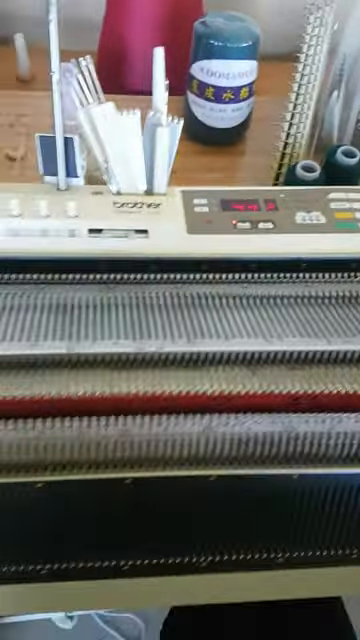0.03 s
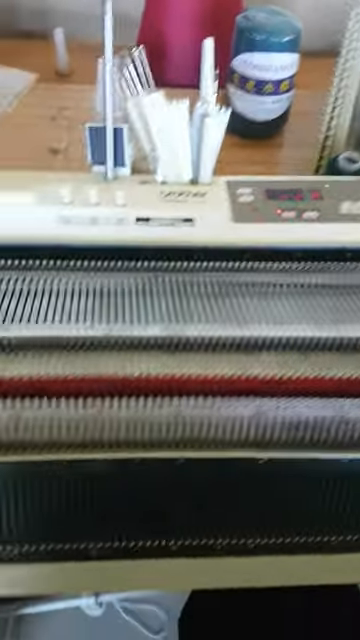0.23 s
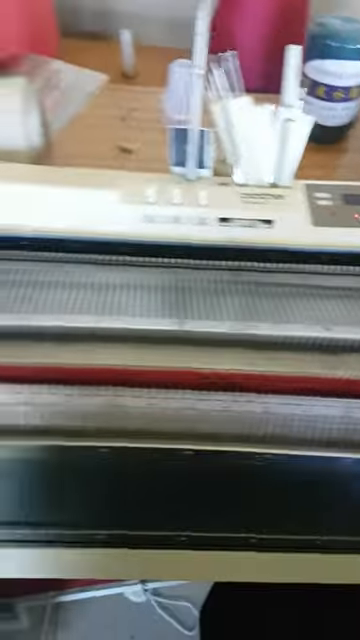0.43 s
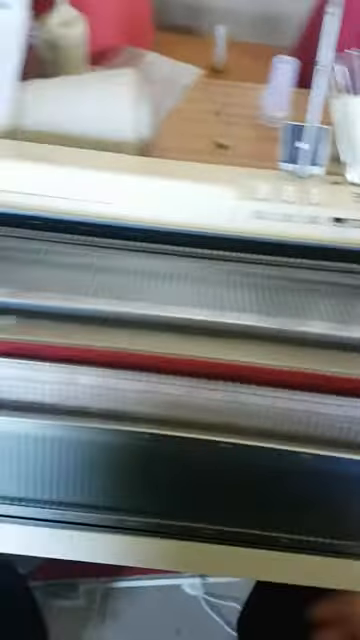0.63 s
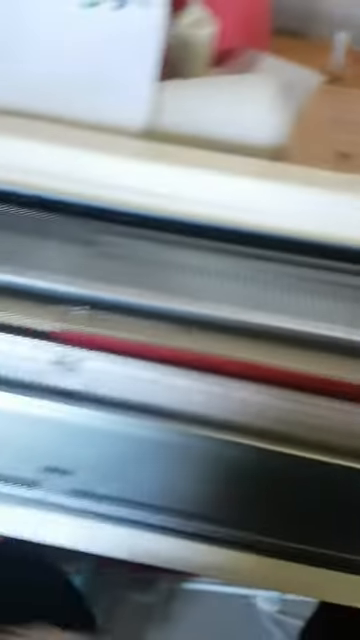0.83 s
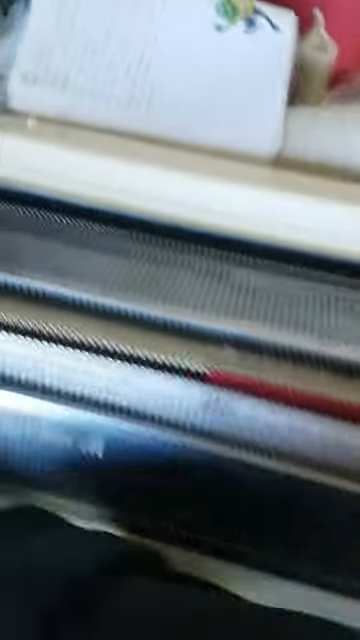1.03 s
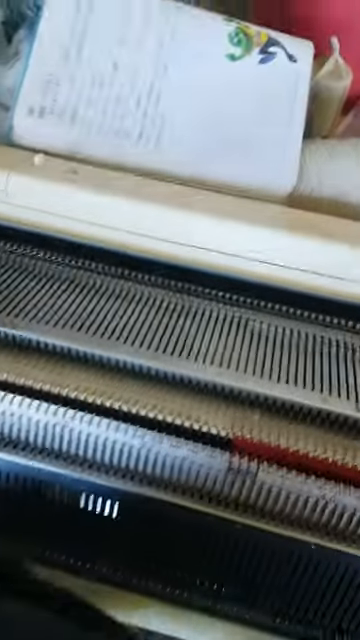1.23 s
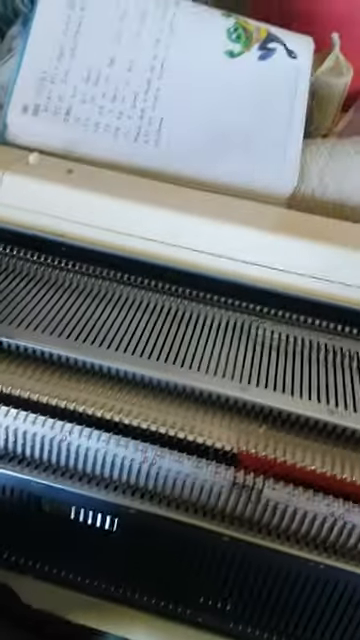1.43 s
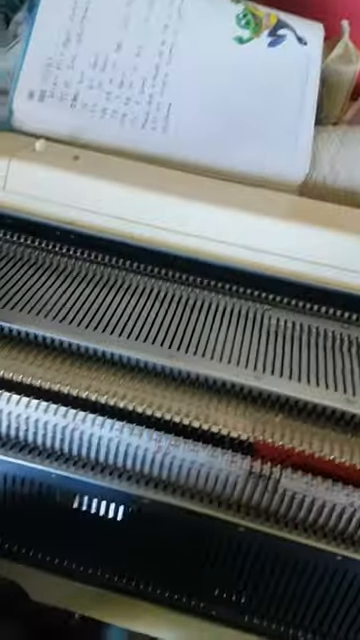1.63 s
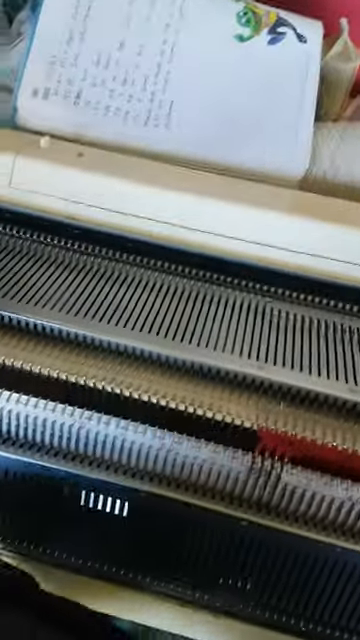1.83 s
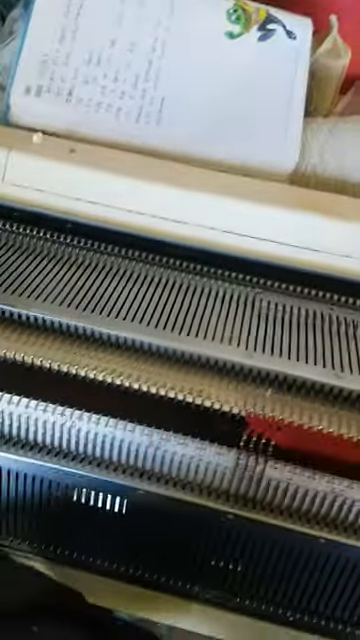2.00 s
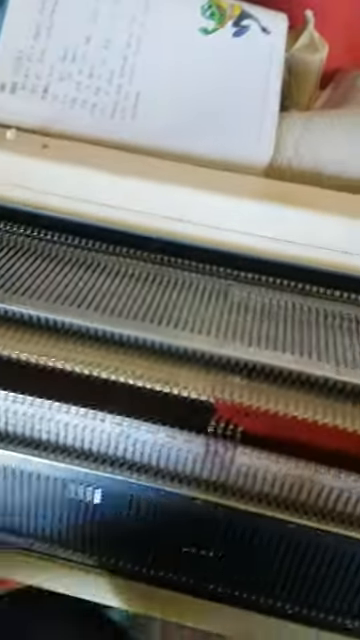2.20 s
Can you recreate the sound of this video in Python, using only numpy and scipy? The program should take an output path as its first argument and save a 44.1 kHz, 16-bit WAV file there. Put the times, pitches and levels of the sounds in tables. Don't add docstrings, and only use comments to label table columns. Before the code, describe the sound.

A knitting machine's metal needle bed is lowered in a small quiet room: faint dull hand taps and tiny ticks, two sharp latch snaps, then a heavy clattering clunk with rattling needles, close stereo handheld microphone.

```python
import sys
import numpy as np
from scipy import signal
from scipy.fft import rfft, irfft, next_fast_len
from scipy.io import wavfile
from scipy.ndimage import map_coordinates

SR = 44100
rng = np.random.default_rng(int(sys.argv[2]) if len(sys.argv) > 2 else 0)


def field_ratio(decibels):
    return 10 ** (np.asarray(decibels, dtype=float) / 20)


def to_wav(s):
    ch = np.atleast_2d(s).T
    pcm = np.round(np.clip(ch, -1, 1) * 32767)
    wavfile.write(sys.argv[1], SR, pcm.astype(np.int16))


N = 99665

# (f/Hz, level/dB, t60/s)
BED_MODES = [(96.6, -4, 0.19), (213, 4, 0.11), (273.5, 7, 0.058), (328, -4.5, 0.11), (396, 4, 0.089),
             (480, -2, 0.093), (612, -1, 0.17), (674, 5, 0.045), (845, -1, 0.1), (938, 0, 0.075),
             (988, -2, 0.12), (1150, -21, 0.028), (1510, -1, 0.042), (2304, -3.5, 0.05)]
# (t/s, crack level/dB, bed level/dB, ring length factor)
BED_HITS = [(1.858, -27.5, -11.5, 0.58), (1.8922, -29.5, -23, 0.76), (1.928, -17.5, -6, 1),
            (1.9428, -20.5, -7.5, 0.81), (1.9533, -22, -19.5, 0.9), (1.965, -25, -15, 1),
            (1.9805, -19, -15.5, 0.84), (1.9969, -25, -33, 0.41), (2.0135, -32.5, -32, 0.29),
            (2.0642, -30, -37, 1), (2.0669, -26, -50, 0.39), (2.075, -35.5, -28, 0.6),
            (2.094, -35, -19.5, 0.45), (2.1172, -30.5, -19.5, 0.35), (2.1186, -29.5, -31.5, 0.71),
            (2.146, -48, -52, .5)]
# (t/s, level/dB)
BED_PUSHES = [
    (1.690, -23.5),
    (1.708, -24.5),
    (1.566, -28),
    (1.869, -16),
    (2.050, -24.5),
    (2.137, -34.5),
]


def falling_bed():
    out = np.zeros((2, N))
    for s, click_db, bed_db, stretch in BED_HITS:
        click = burst(click_db - 3.5, click_db - 11.5, stretch)
        clunk = field_ratio(bed_db - 1) * ring(BED_MODES, stretch, rise_s=0.0021, scatter_db=2)
        add(out, s, roomy(click + clunk))
    for s, db in BED_PUSHES:
        add(out, s, roomy(field_ratio(db) * ring(BED_MODES, 0.97, rise_s=0.0022, scatter_db=2)))
    return out


# (t/s, level/dB, t60/s)
TABLE_BOOMS = [
    (0.028, -39, 0.35),
    (.244, -42.5, 0.2),
    (1.566, -25, 0.074),
    (1.709, -33.5, 0.24),
    (1.865, -23, 0.33),
    (1.933, -22, 0.14),
    (1.947, -16, 0.071),
    (1.982, -26.5, 0.45),
    (2.041, -24, 0.12),
    (2.069, -31.5, 0.44),
]


def table_booms():
    out = np.zeros((2, N))
    boom_hz = 141.8
    for s, db, t60 in TABLE_BOOMS:
        modes = [(boom_hz, 0, t60), (boom_hz * 1.1, -7, t60)]
        add(out, s, roomy(field_ratio(db) * ring(modes, 1.0, rise_s=0.0023, scatter_db=0)))
    return out


RATTLE_TIMES = [1.857, 1.859, 1.9, 1.926, 1.929, 1.96, 2.018, 2.03, 2.2]
RATTLE_LEVELS = [-70, -32, -31, -40, -19, -21, -24, -36, -58]
# (f/Hz, level/dB per Hz)
HOOK_COLOUR = [(5000, -20), (7400, -7), (8000, -30), (9000, -30), (9600, -7), (12000, 0), (15700, -3),
               (16100, -40)]


def needle_rattle():
    per_s, scatter_db, hooks_db, hooks_grow = 4600, 2.5, -47, 1.3
    struck = rng.random((2, N)) < per_s / SR
    strength = field_ratio(scatter_db * rng.exponential(size=(2, N)).clip(0, 3))
    jostle = struck * rng.standard_normal((2, N)) * strength
    level_db = np.interp(np.arange(N) / SR, RATTLE_TIMES, RATTLE_LEVELS, left=-120) - 0.5
    level_db = level_db + 2.3 * wobble(70)
    hook_level = field_ratio(hooks_db + hooks_grow * (level_db - max(RATTLE_LEVELS)))
    hooks = causal(rng.standard_normal((2, N)) * hook_level, closed(HOOK_COLOUR))
    return hooks + roomy(causal(unit(jostle) * field_ratio(level_db), CLATTER_COLOUR))[:, :N]


# (f/Hz, level/dB per Hz)
CRACK_COLOUR = [(500, -14.5), (1290, -8), (2200, -3), (3100, -10), (4000, -9), (8500, -44), (12500, -20),
                (16700, -44)]
# (f/Hz, level/dB per Hz)
CLATTER_COLOUR = [(120, -24), (200, -7.5), (538, -10), (2200, -21.5), (4860, -35.5), (8500, -50.5),
                  (11700, -61), (15700, -49), (16100, -84)]


def burst(crack_db, shake_db, stretch):
    crack_t60, shake_t60, grain_db = 0.016, 0.21, 1.5
    t = np.arange(SR // 3) / SR
    grain = field_ratio(grain_db * np.repeat(rng.standard_normal(len(t) // 64 + 1), 64)[:len(t)])
    crack, shake = rng.standard_normal((2, 2, len(t)))
    crack = crack * field_ratio(crack_db - 60 * t / crack_t60)
    shake = shake * grain * field_ratio(shake_db - 60 * t / (shake_t60 * stretch))
    return causal(crack, CRACK_COLOUR) + causal(shake, CLATTER_COLOUR)


# (t/s, ring level/dB, crack level/dB, shake level/dB)
STEEL_SNAPS = [
    (1.5587, -8.5, -23, -33),
    (1.6946, -13, -27, -32),
    (1.9285, -9.5, -21, -40),
]
# (f/Hz, level/dB, t60/s)
STEEL_MODES = [
    [(930, -8, .03), (1330, -3, .014), (1520, -1, .016), (1820, 0, .018), (2050, -1, .016),
     (2300, -8, .012), (3550, -19, .014), (4700, -22, .012), (7200, -30, .006), (10000, -21, .008)],
    [(440, -2, .025), (640, -9, .02), (900, -6, .025), (1400, 0, .016), (1810, -5, .02), (2120, -5, .02),
     (2600, -10, .012), (3600, -9, .013), (4080, -11, .013), (12000, -20, .008)],
    [(610, -4, .04), (980, 0, .035), (1200, -5, .025), (1480, 0, .03), (1750, -4, .022), (2100, -6, .02),
     (2700, -9, .016), (3800, -13, .014)],
]


def latches():
    out = np.zeros((2, N))
    for (s, ring_db, crack_db, shake_db), modes in zip(STEEL_SNAPS, STEEL_MODES):
        steel = field_ratio(ring_db) * ring(modes, 1, rise_s=.0008, scatter_db=1)
        add(out, s, roomy(steel + burst(crack_db, shake_db, 0.98)))
    return out


# (t/s, level/dB)
METAL_TICKS = [
    (.226, -44),
    (.385, -49),
    (.391, -52),
    (.690, -55),
    (.714, -53),
]


def ticks():
    out = np.zeros((2, N))
    for s, db in METAL_TICKS:
        add(out, s, roomy(burst(db - 9, db - 0.5, 0.72)))
    return out


# (f/Hz, level/dB, t60/s)
CASE_MODES = [(121, -14, 0.062), (154, -6.5, 0.15), (223.6, 0.5, 0.15), (255, -2, 0.1), (330, -4, 0.042)]
# (f/Hz, level/dB, t60/s)
PANEL_MODES = [(330, 0, .06), (440, -3, .06), (590, 1, .07), (690, -4, .05), (830, 3, .07), (900, -1, .05),
               (1030, -3, .045)]
# (t/s, thump level/dB, knock level/dB, brightest panel f/Hz, ring length factor)
HAND_TAPS = [
    (0.025, -36, -45.5, 400, 1.12),
    (.2255, -47, -29.5, 620, 0.91),
    (.234, -49.5, -35, 315, 0.97),
    (.367, -44.5, -39, 480, 0.44),
    (.386, -48, -52, 630, 1.9),
    (0.605, -41, -43, 397, 0.43),
    (.678, -37, -30.5, 830, 0.45),
    (.684, -31, -55, 900, 0.54),
    (0.717, -41, -39, 436, 0.97),
    (1.2856, -27, -33.5, 670, 0.32),
]


def taps():
    out = np.zeros((2, N))
    db_per_octave = -15
    for s, thump_db, knock_db, panel_hz, stretch in HAND_TAPS:
        panels = [(hz, db + db_per_octave * abs(np.log2(hz / panel_hz)), t60) for hz, db, t60 in PANEL_MODES]
        thump = field_ratio(thump_db) * ring(CASE_MODES, stretch, rise_s=0.0011, scatter_db=2)
        knock = field_ratio(knock_db) * ring(panels, stretch, rise_s=.0008, scatter_db=2)
        add(out, s, roomy(thump + knock))
    return out


# (t/s, level/dB)
HAND_STIR = [(0, 4), (.15, 3), (0.302, -2), (.55, 0), (.75, 3), (.9, 2), (1.1, 5), (1.2, -0.5), (2.26, 6.5)]
# (f/Hz, level/dB per Hz)
RUMBLE_COLOUR = [(12, -54), (20, -14), (70, -2.5), (114, 0.5), (192, -5.5), (409, -10.5), (600, -27),
                 (780, -62), (1320, -120)]
# (f/Hz, level/dB per Hz)
AIR_COLOUR = [(300, -11.5), (450, -10.5), (950, -8.5), (1420, -10), (1900, -9.5), (3100, -22), (4500, -20),
              (6200, -31.5)]
# (f/Hz, level/dB per Hz)
FIZZ_COLOUR = [(5500, -28), (7000, -4.5), (9300, -6.5), (11000, -3), (14500, 2.5), (15700, 0)]


def background():
    top_hz, whine_hz, whine_width_hz = 15800, 14280, 78
    stir_db = np.interp(np.arange(N) / SR, *np.transpose(HAND_STIR))

    rumble = noise(lambda hz: field_ratio(along(RUMBLE_COLOUR, hz)))
    rumble = rumble * field_ratio(-53 + stir_db + 1.5 * wobble(8.63) + 1.5 * wobble(28.84))

    air = noise(lambda hz: field_ratio(along(closed(AIR_COLOUR), hz)))
    air = air * field_ratio(-59.5 + 0.51 * stir_db + wobble(5.2))

    fizz = noise(lambda hz: field_ratio(along(closed(FIZZ_COLOUR), hz)) * (hz < top_hz))
    fizz = fizz * field_ratio(-74.5 + 0.47 * wobble(4.0))

    whine = noise(lambda hz: 1 / (1 + ((hz - whine_hz) / whine_width_hz) ** 2) * (hz < top_hz))
    return rumble + air + fizz + whine * field_ratio(-78)


def noise(response):
    return unit(filtered(rng.standard_normal((2, N)), response))


def unit(x):
    return x / np.sqrt(np.mean(x ** 2) + 1e-20)


def along(points, hz):
    f, v = np.transpose(points)
    return np.interp(np.log(hz + 1), np.log(f + 1), v)


def closed(points):
    return [(points[0][0] / 2, -90)] + points + [(points[-1][0] * 2.0, -90)]


def wobble(rate):
    return map_coordinates(rng.standard_normal(N // 100), [np.arange(N) * rate / SR])


def filtered(x, response):
    m = next_fast_len(x.shape[-1] + 8192)
    spectrum = rfft(x, m) * response(np.fft.rfftfreq(m, 1 / SR))
    return irfft(spectrum, m)[..., :x.shape[-1]]


def causal(x, spectrum):
    cepstrum = irfft(np.log(field_ratio(along(spectrum, np.fft.rfftfreq(2048, 1 / SR))) + 1e-6))
    cepstrum[1:1024] *= 2
    cepstrum[1025:] = 0
    h = irfft(np.exp(rfft(cepstrum)))
    return signal.fftconvolve(x, h[None] / np.linalg.norm(h), axes=1)[:, :x.shape[1]]


def ring(modes, stretch, rise_s, scatter_db):
    detune, phase_scatter, stray_db = .012, .4, -9
    t = np.arange(SR // 3) / SR
    hz, db, t60 = np.transpose(modes)[:, :, None]
    level_draw, pitch_draw, phase_draw = rng.standard_normal((3, 2, len(modes), 1))
    decay = field_ratio(db + scatter_db * level_draw - 60 * t / (t60 * stretch))
    phase = np.reshape([phase_scatter, 2 * np.pi], (2, 1, 1)) * phase_draw
    waves = decay * np.sin(2 * np.pi * hz * (1 + detune * pitch_draw) * t + phase)
    strike = waves.sum(1) / np.linalg.norm(field_ratio(db)) * (1 - np.exp(-t / rise_s))
    return field_ratio([[0], [stray_db]]) * strike


def add(track, s, sound):
    part = track[:, round(s * SR):][:, :sound.shape[1]]
    part += sound[:, :part.shape[1]]


# (f/Hz, t60/s)
ROOM_DECAY = [(120, 0.49), (1000, 0.29), (10000, 0.35)]


def roomy(sound):
    delay_s, room_db = .004, -12.5
    hz, t, z = signal.stft(rng.standard_normal((2, SR // 2)), SR, nperseg=256)
    z = z * field_ratio(-60 * t / along(ROOM_DECAY, hz)[:, None])
    tail = signal.istft(z, SR, nperseg=256)[1]
    tail = tail / np.linalg.norm(tail, axis=1, keepdims=True)
    delayed = np.pad(sound[:1], ((0, 0), (round(delay_s * SR), 0)))
    wet = signal.fftconvolve(delayed, tail, axes=1) * field_ratio(room_db)
    wet[:, :sound.shape[1]] += sound
    return wet


def ports(pair, alike, lean, lead):
    def share(hz):
        turn = np.arccos(np.clip(along(alike, hz), -1, 1)) / 2
        return [np.cos(turn), np.sin(turn)]

    def tilt(hz):
        level = field_ratio(np.outer([.5, -.5], along(lean, hz)))
        return level * np.exp(1j * np.outer([.5, -.5], along(lead, hz)))

    mid, side = filtered(pair, share)
    return filtered(np.array([mid + side, mid - side]), tilt)


# (f/Hz, likeness)
MACHINE_ALIKE = [(100, 0.95), (300, 1), (600, 0.42), (1200, 0.27), (2500, 0.25), (5000, 0.1), (12000, 0.12)]
# (f/Hz, level/dB)
MACHINE_LEAN = [(100, -.5), (550, -4.5), (900, -4.5), (1300, 0), (2000, 2), (4300, -8), (8000, -1),
                (13000, -3.5)]
# (f/Hz, phase/rad)
MACHINE_LEAD = [(60, -.2), (300, -.2), (900, .4), (1300, .8), (2000, -.1), (2800, -1.2), (4300, -.2),
                (9000, 2.6)]
# (f/Hz, likeness)
HAND_ALIKE = [(100, 0.99), (300, 0.99), (600, 0.87), (900, 0.42), (1300, 0.56), (2000, 0.24), (5000, 0.25),
              (12000, 0.063)]
# (f/Hz, level/dB)
HAND_LEAN = [(100, 0), (300, -2), (550, -5), (900, -7), (1300, -1.5), (2000, 4), (4300, -1.5), (13000, 2)]
# (f/Hz, phase/rad)
HAND_LEAD = [(60, -.25), (300, -.35), (550, -.8), (900, -1), (1300, -3), (2000, -2.3), (4300, -1.8),
             (13000, -2.8)]


def scene():
    notch_hz, notch_width_hz, notch_db = 8600, 500, -12
    metal = falling_bed() + table_booms() + needle_rattle() + latches() + ticks()
    metal = filtered(metal, lambda hz: field_ratio(notch_db * np.exp(-((hz - notch_hz) / notch_width_hz) ** 2)))
    machine = ports(metal, MACHINE_ALIKE, MACHINE_LEAN, MACHINE_LEAD)
    return machine + ports(taps() + background(), HAND_ALIKE, HAND_LEAN, HAND_LEAD)


def band_limit(x):
    return signal.sosfilt(signal.butter(12, 16820, fs=SR, output="sos"), x)


def record(dry):
    top_hz = 16750
    mix = filtered(dry, lambda hz: hz < top_hz)
    return band_limit(mix)


dry = scene()
out = record(dry)
to_wav(out)
```